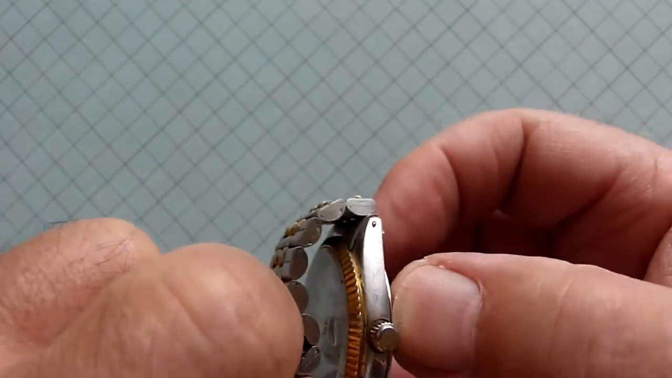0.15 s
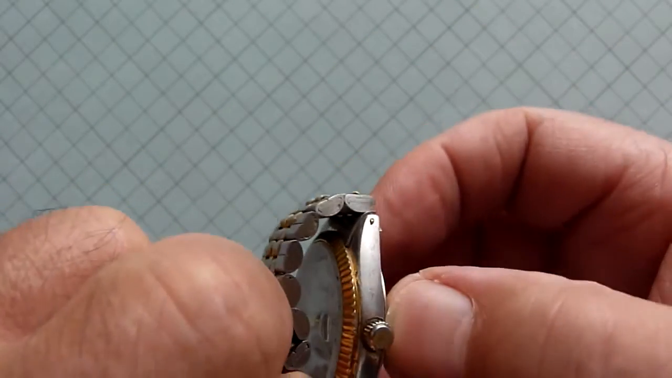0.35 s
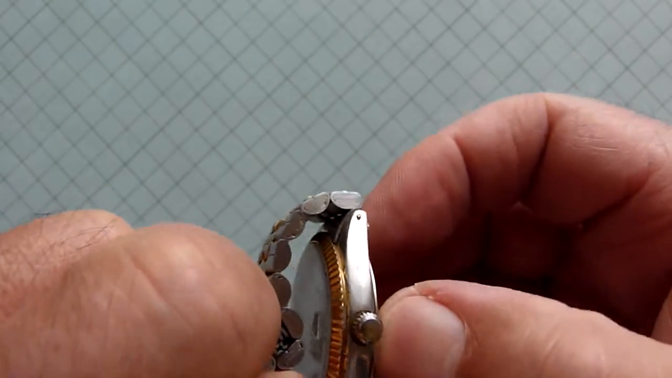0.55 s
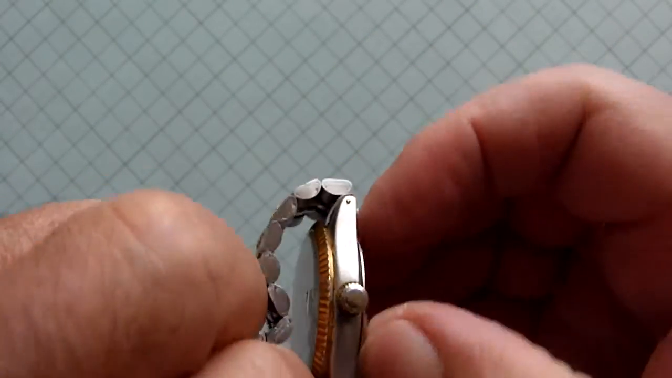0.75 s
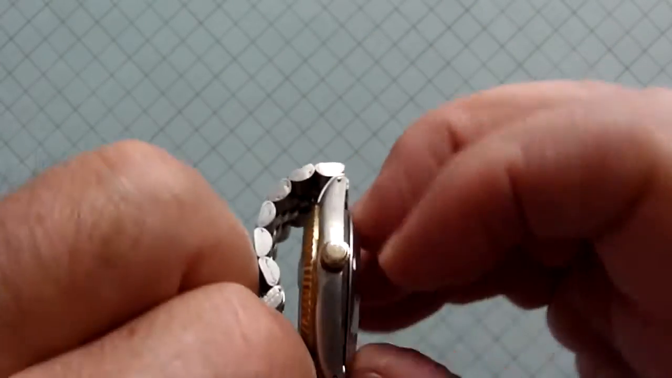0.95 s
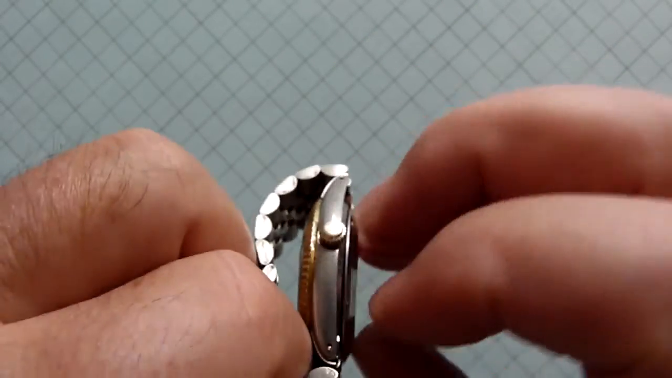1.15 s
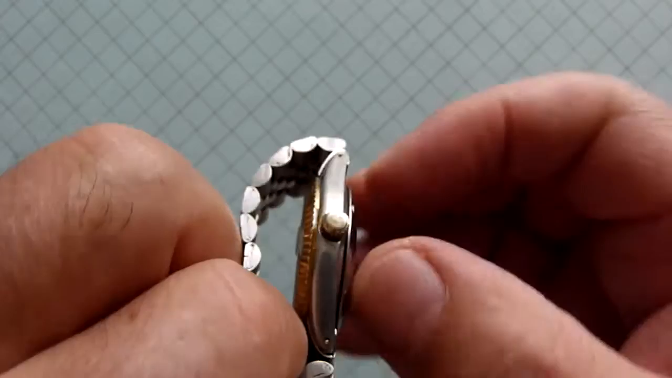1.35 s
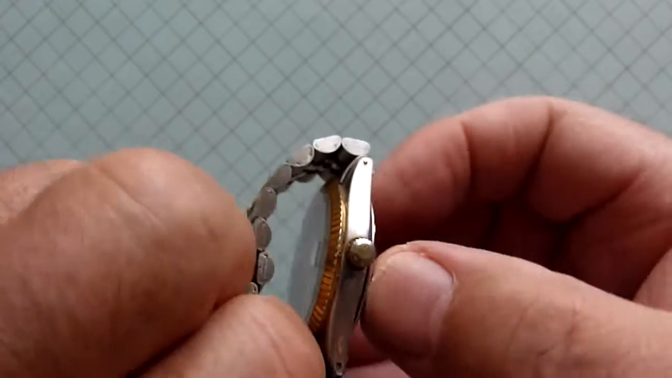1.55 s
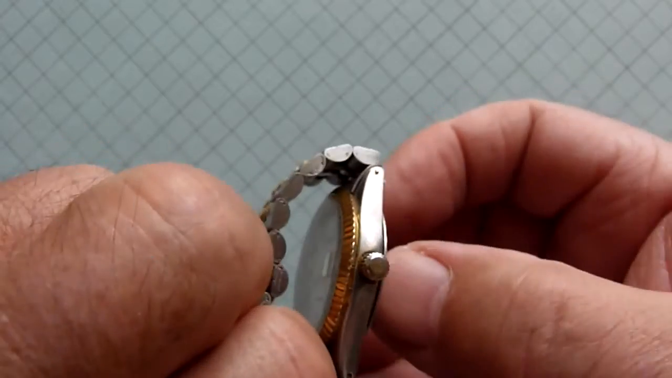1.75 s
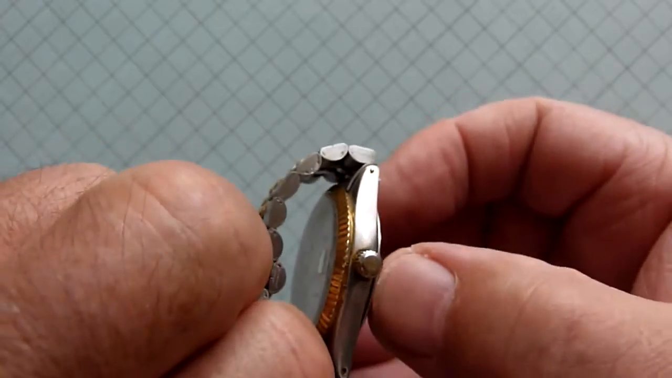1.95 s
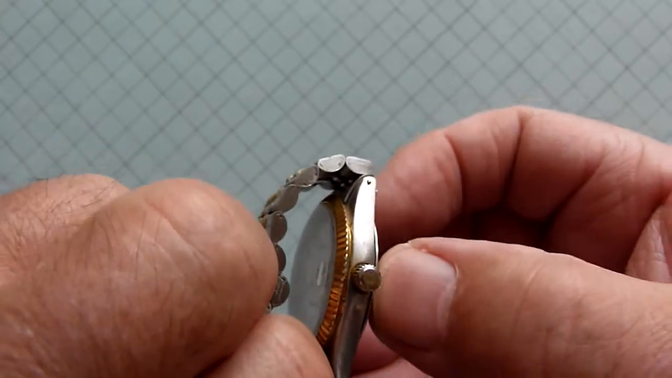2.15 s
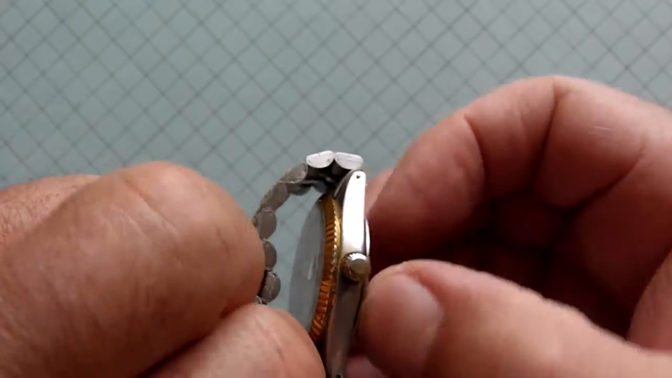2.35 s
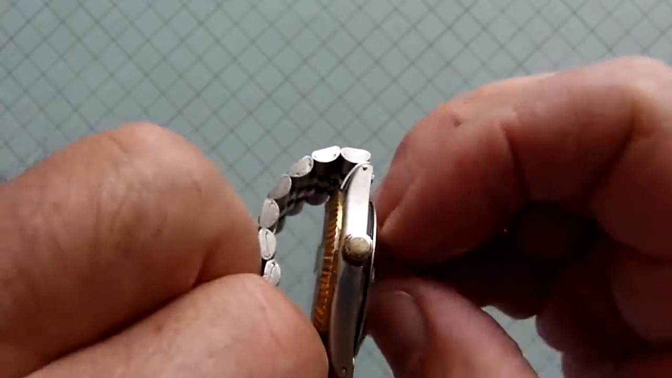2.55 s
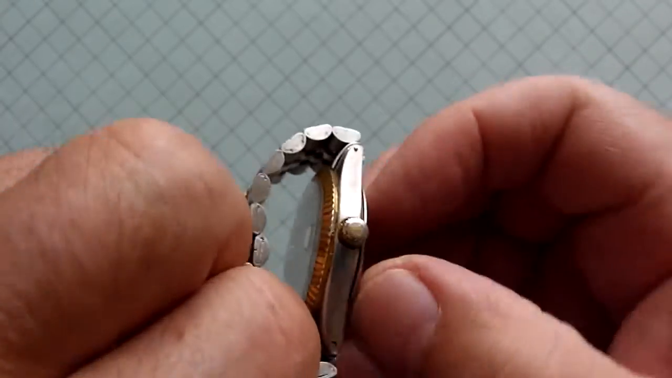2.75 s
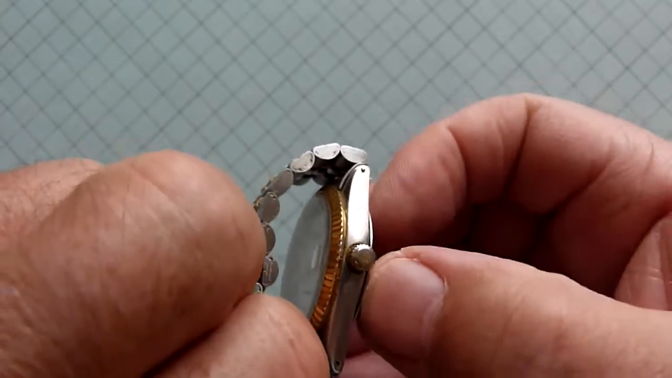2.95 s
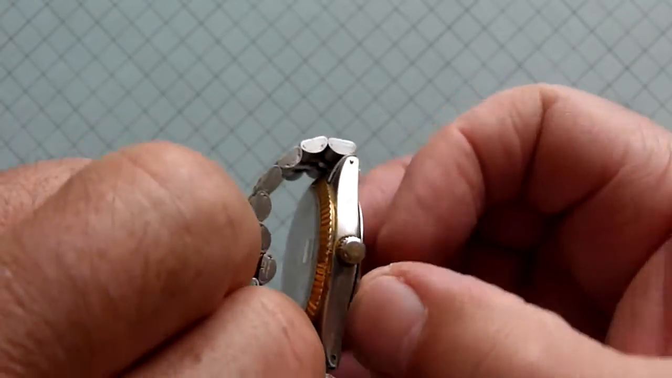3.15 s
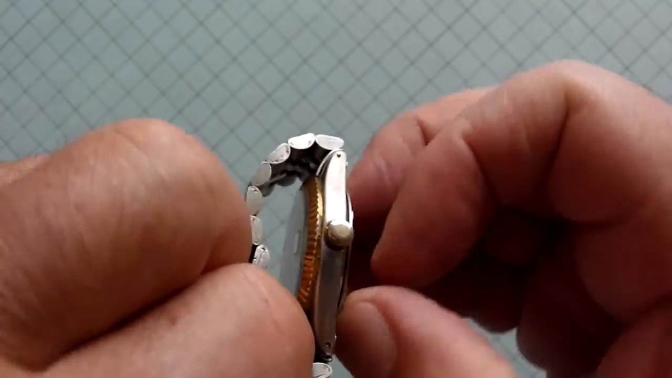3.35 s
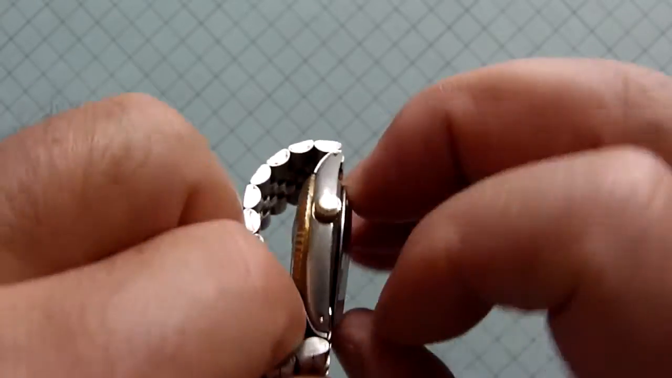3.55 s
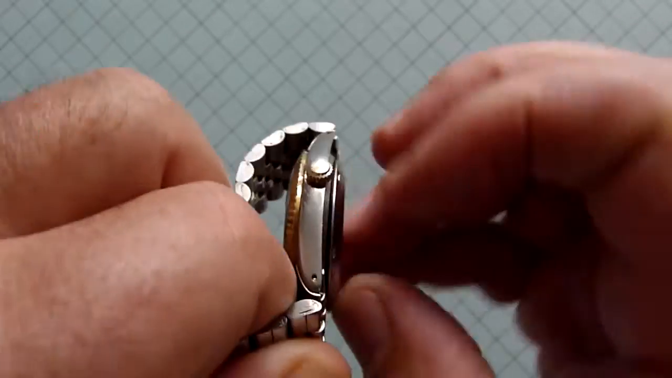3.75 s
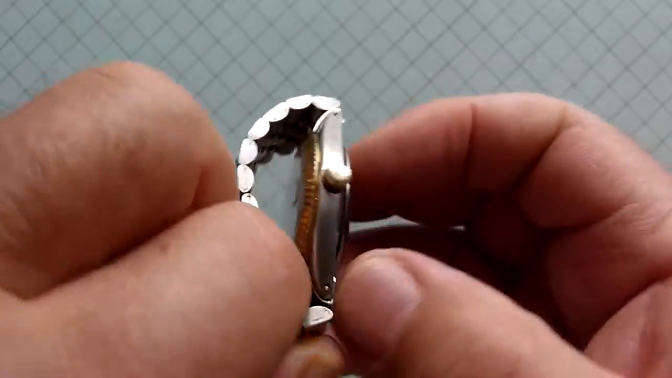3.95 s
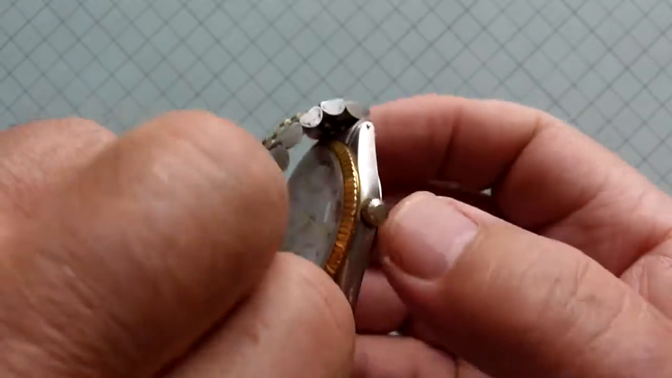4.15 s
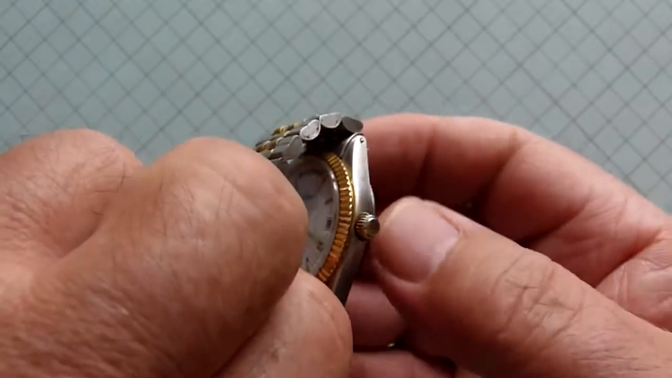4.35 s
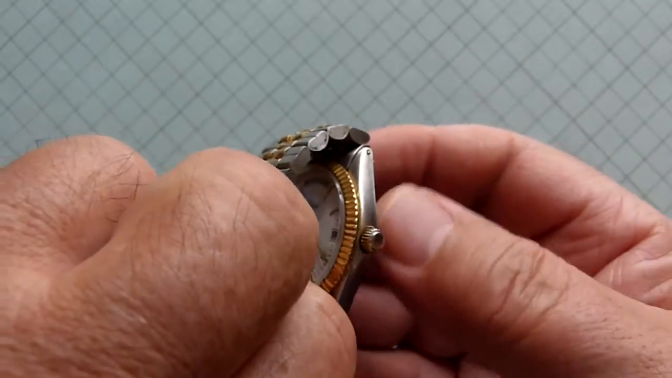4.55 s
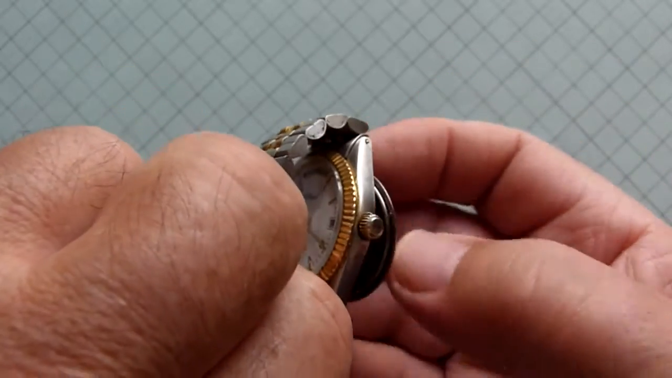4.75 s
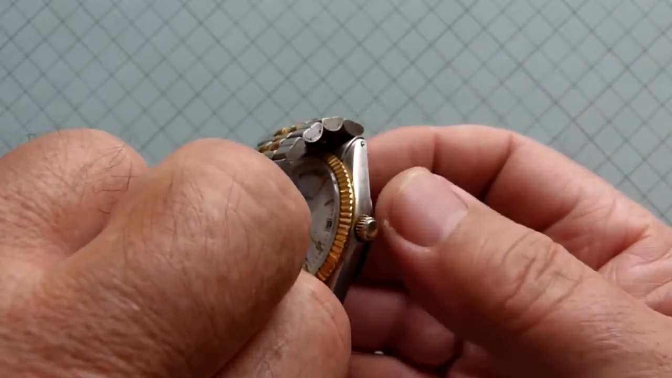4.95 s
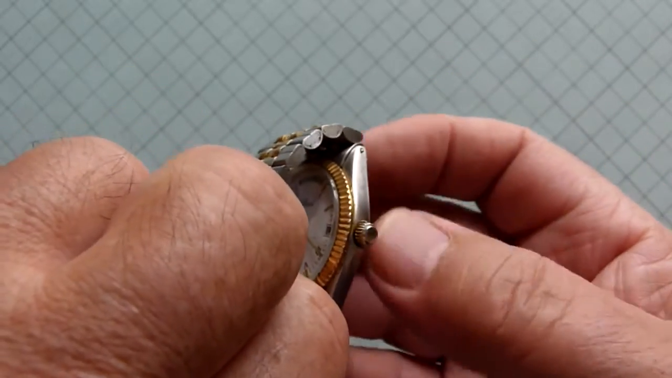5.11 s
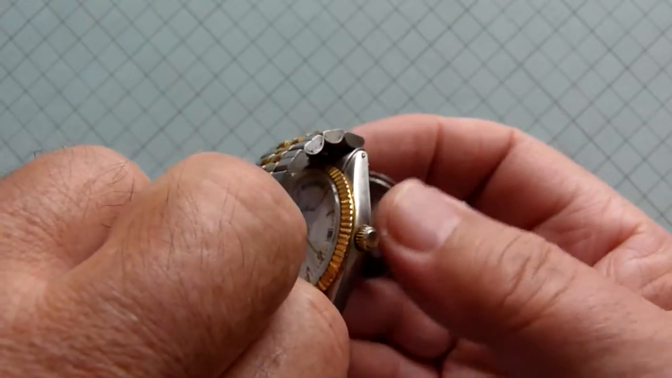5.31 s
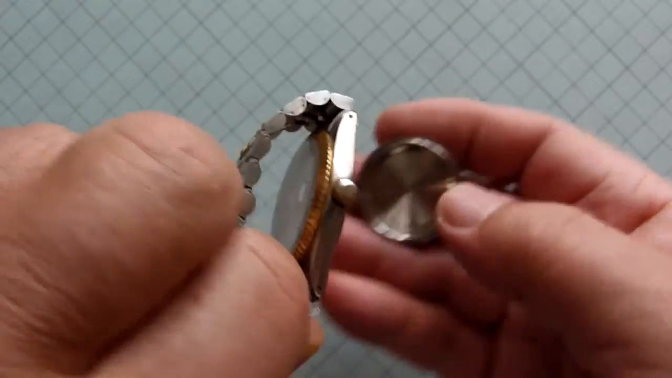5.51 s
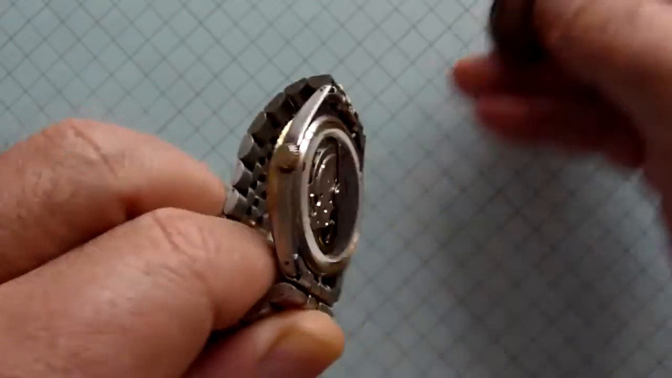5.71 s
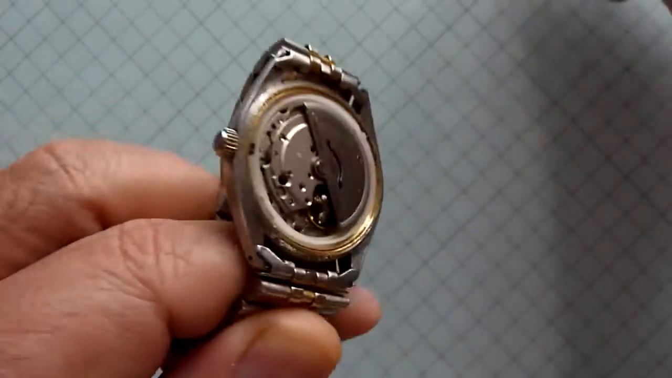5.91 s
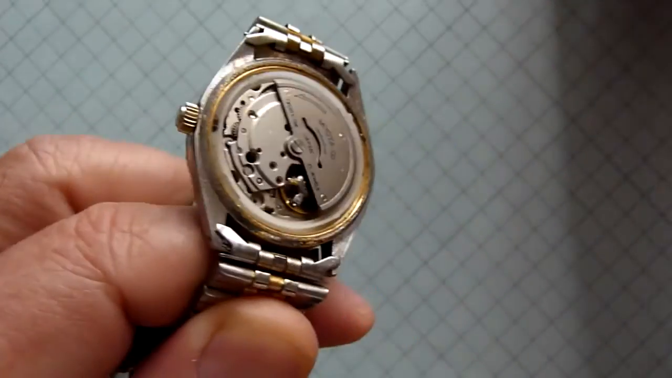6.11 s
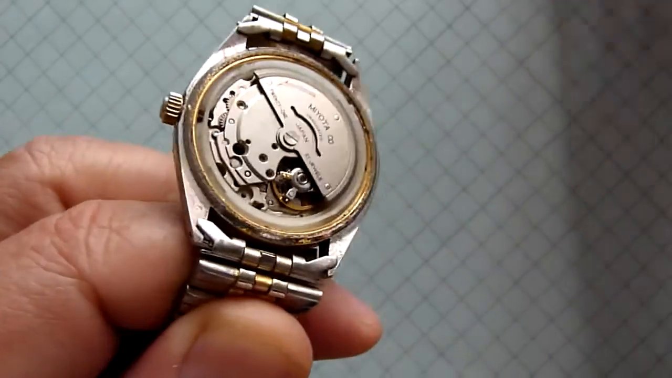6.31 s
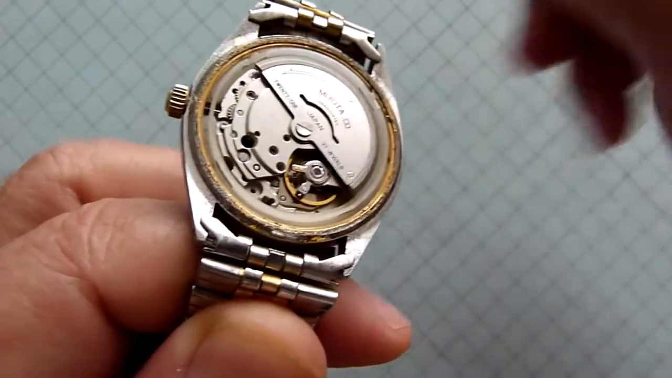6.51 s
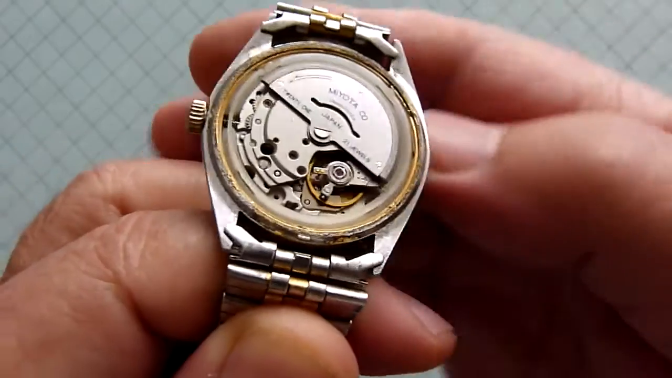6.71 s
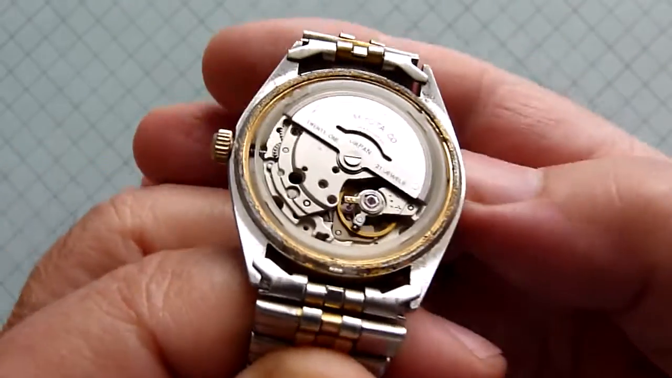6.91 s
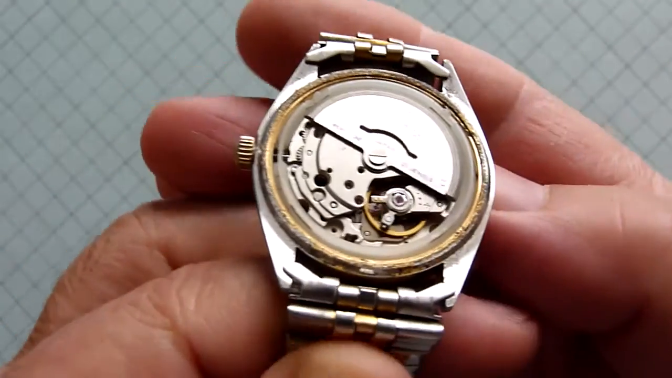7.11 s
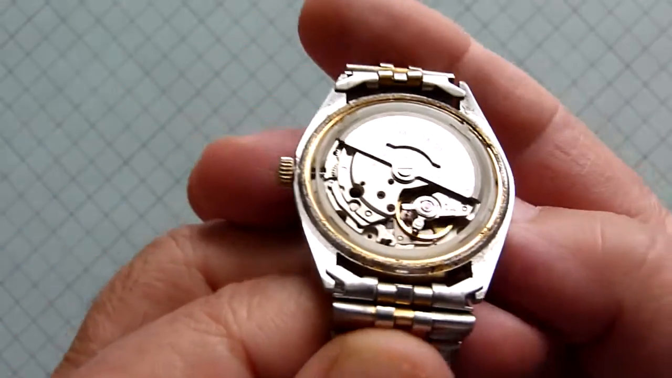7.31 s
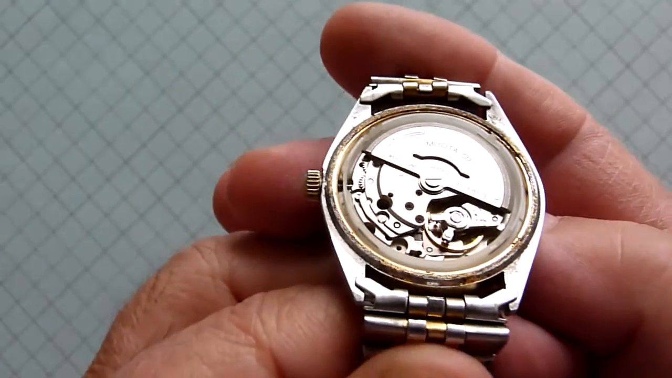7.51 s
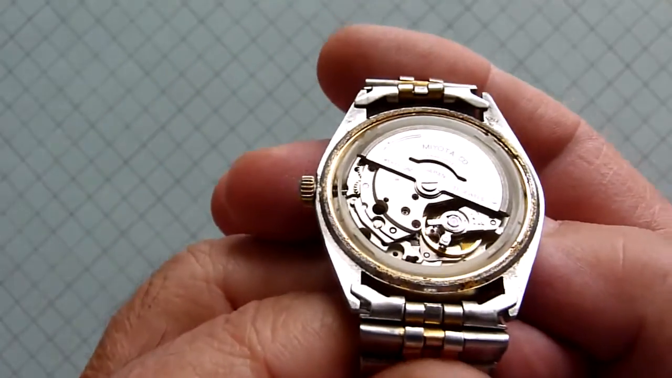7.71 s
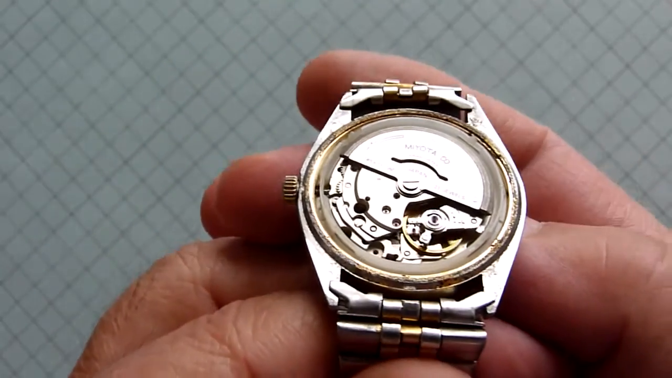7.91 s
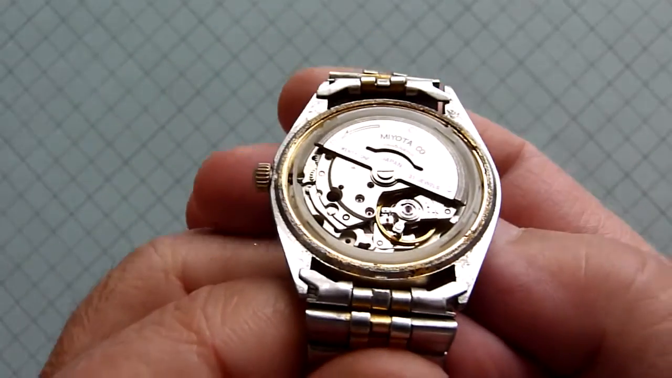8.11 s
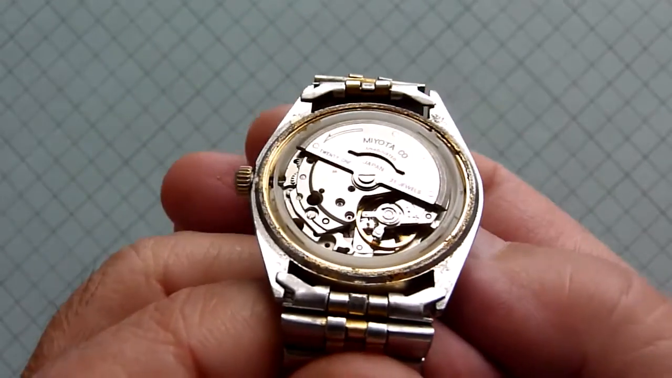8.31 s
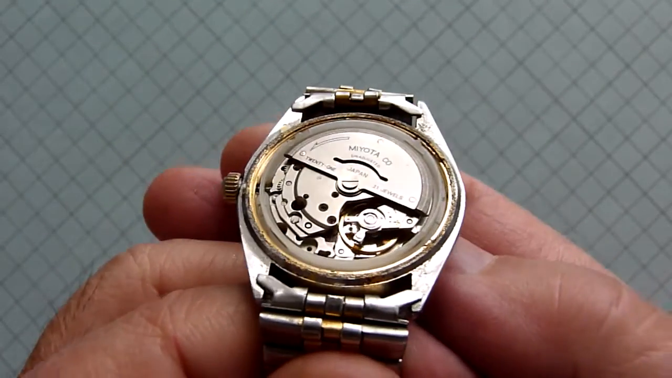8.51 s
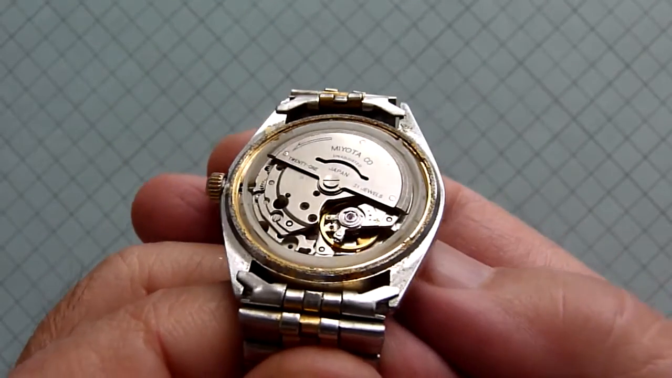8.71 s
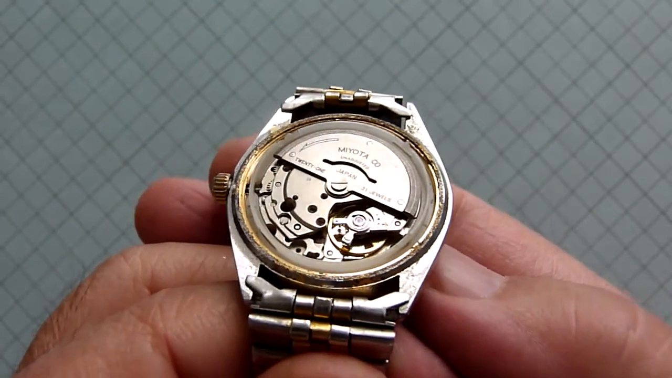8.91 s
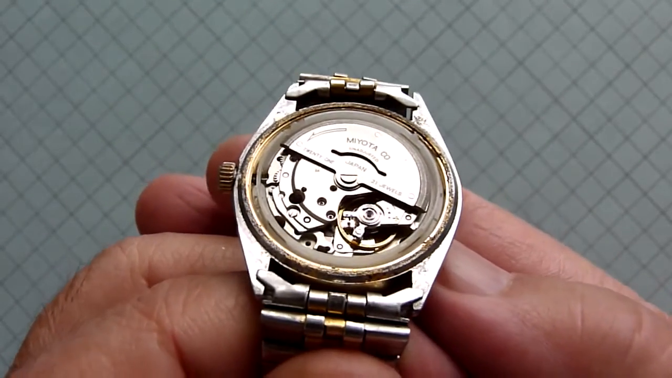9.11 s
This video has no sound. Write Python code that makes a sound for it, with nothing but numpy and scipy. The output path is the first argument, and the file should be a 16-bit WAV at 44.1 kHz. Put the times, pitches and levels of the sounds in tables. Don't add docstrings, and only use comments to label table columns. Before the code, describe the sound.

Very close in a quiet room, fingers rub a steel wristwatch with faint ticks and link clicks. After four seconds the loosened back rattles in a run of small dry knocks, then comes off with a bright, sharp clink at five and a half. Three firmer table taps follow, then soft handling, with light bracelet clicks near the end. Faint hum, hiss and distant traffic lie beneath.

```python
import sys
import numpy as np
from scipy import signal
from scipy.fft import rfft, irfft, next_fast_len
from scipy.io import wavfile
from scipy.ndimage import uniform_filter1d, map_coordinates

SR = 44100
rng = np.random.default_rng(int(sys.argv[2]) if len(sys.argv) > 2 else 0)


def generate_wav(signal):
    frames = np.transpose(np.atleast_2d(signal))
    scaled = np.clip(frames, -1, 1) * 32767
    pcm = np.round(scaled).astype(np.int16)
    wavfile.write(sys.argv[1], SR, pcm)


def volts_from_decibels(level):
    exponent = np.asarray(level, float) / 20
    return 10 ** exponent


N = 404232
BLOW_T = np.arange(SR // 11) / SR
LIFT_OFF = 5.5

# [f/Hz, width/Hz, level/dB]
LID_EDGE = [(7000, 220, 0.5), (9000, 1840, 2), (10470, 1550, 1.5), (11490, 800, 2.5), (13000, 2000, -28.5),
            (14300, 490, 1)]


def lid():
    # [t/s, knock level/dB, knock f/Hz, edge level/dB, ring level/dB]
    clinks = [(1.6916, -44.5, 1760, -39.5, -66), (2.8932, -32.5, 1270, -31.5, -76),
              (4.211, -32.5, 1580, -39.5, -40), (4.3211, -39, 1290, -34.5, -60),
              (4.7089, -34.5, 1420, -39.5, -59), (5.2259, -27, 1720, -31, -45.5),
              (5.539, -24, 1620, -13, -25), (5.5453, -29, 1910, -27, -39), (5.581, -36, 2100, -33.5, -47.5),
              (5.5878, -24, 2070, -28.5, -39), (5.602, -30, 1760, -37, -46.5), (5.607, -34, 1750, -31, -50)]
    # [t/s, knock level/dB, knock f/Hz, tick level/dB]
    rattle = [(4.0816, -52, 1580, -49), (4.1083, -44, 1380, -47), (4.137, -39.5, 1760, -48.5),
              (4.1745, -31, 1300, -46), (4.1843, -35, 1580, -43), (4.188, -43, 1610, -53),
              (4.2175, -37, 1800, -32.5), (4.3006, -46, 1710, -47), (4.3087, -47, 1570, -55),
              (4.399, -39, 1360, -40.5), (4.619, -46, 1560, -53), (4.695, -33, 1740, -49),
              (4.701, -27.5, 1510, -37), (4.749, -40, 1590, -52), (4.831, -48, 1610, -58),
              (4.856, -44, 1700, -50), (4.8588, -36, 1820, -41), (4.866, -35, 1720, -35),
              (4.8713, -37, 1680, -41), (4.88, -38, 1690, -54), (4.931, -45, 1700, -47),
              (4.9471, -36.5, 1680, -46), (5.003, -43, 1410, -63), (5.1907, -36, 1440, -54),
              (5.2297, -34.5, 1820, -44), (5.352, -38, 1700, -53), (5.3563, -33, 1500, -39),
              (5.362, -39, 1680, -46)]
    out = np.zeros((2, N + SR))
    for s, knock_db, hz, edge_db, ring_db in clinks:
        tick_db = edge_db + (0.8 if s < LIFT_OFF else -7.5)
        lid_blow(out, s, knock_db, hz, tick_db, edge_db, ring_db)
    for s, knock_db, hz, tick_db in rattle:
        lid_blow(out, s, knock_db, hz, tick_db, edge_db=tick_db - 11, ring_db=tick_db - 25)
    return out[:, :N]


def lid_blow(out, s, knock_db, hz, tick_db, edge_db, ring_db):
    # [f/Hz, width/Hz, level/dB]
    seated_tick = [(2040, 890, -0.5), (3600, 760, 2.5), (5700, 4050, 2), (7000, 2800, 0.5)]
    # [f/Hz, width/Hz, level/dB]
    free_tick = [(2200, 700, -3.5), (4000, 1800, -4.5), (5500, 1550, 0.5), (7000, 1950, -4.5)]
    seated = s < LIFT_OFF
    body = volts_from_decibels(knock_db + 5) * knock(hz, 0.01)
    parts = volts_from_decibels(tick_db + 1.5) * tick(seated_tick if seated else free_tick, 0.013, 0.6)
    edge = volts_from_decibels(edge_db) * tick(LID_EDGE, 0.0072, 0.12, hard=30)
    lean = volts_from_decibels(2.2 * np.array([[-1], [1], [0]]))
    ring = volts_from_decibels(ring_db + 7.5) * lean * lid_ring(seated)
    add(out, s, body + parts + edge + ring, room_db=-0.4)


def lid_ring(seated):
    # [f/Hz, level/dB, t60/s]
    lid_modes = [(5600, -13.5, 0.033), (5720, -10, .045), (5880, -12, .03), (8530, -14, .05),
                 (8700, -13, 0.05), (9400, -16, .04), (10760, -16, .04), (11440, -3, 0.065),
                 (11900, -15, 0.06), (11380, -7, .06), (14400, -17, .035), (14900, -24.5, .04)]
    hz, db, t60 = np.transpose(lid_modes)
    detune, share, phase = rng.standard_normal((3, len(hz)))
    db = db + 1.2 * share + 8 * seated * (abs(hz - 5730) < 90)
    lag = (0.89 + 0.6 * phase) * hz / 9000
    y = rings(hz * (1 + 0.0013 * detune), db, t60, lag, attack=0.00016)
    return y[[0, 1, 0]]


def table_taps():
    # [t/s, knock level/dB, knock f/Hz, thud level/dB]
    taps = [
        (6.3867, -18, 1060, -37),
        (6.591, -23, 937, -31),
        (6.631, -21.5, 996, -37.5),
    ]
    # [f/Hz, width/Hz, level/dB]
    rim_tick = [(2000, 860, 2), (3320, 890, 4), (5700, 3300, -5.5)]
    out = np.zeros((2, N + SR))
    for s, knock_db, hz, thud_db in taps:
        body = volts_from_decibels(knock_db) * knock(hz, 0.013)
        table = knock(344, 0.032) + volts_from_decibels(-7.5) * knock(642, 0.1)
        thud = volts_from_decibels(thud_db) * table
        edge = volts_from_decibels(thud_db - 14.5) * tick(LID_EDGE, 0.012, 0.4)
        rim = volts_from_decibels(knock_db - 16) * tick(rim_tick, 0.018, 0.47)
        add(out, s, body + thud + edge + rim, room_db=2)
    return out[:, :N]


def case_and_links():
    # [t/s, knock level/dB, knock f/Hz, tick level/dB]
    grips = [(0.401, -49, 1000, -60.5), (0.7075, -48.5, 1230, -57), (1.1329, -48.5, 1180, -50),
             (1.3015, -49, 1180, -54), (1.3167, -47, 1710, -37.5), (1.468, -46, 1610, -59),
             (1.4789, -51, 1540, -40.5), (1.568, -47.5, 1460, -42.5), (1.572, -50, 1300, -54),
             (1.584, -44, 447, -55), (1.748, -45.5, 400, -55), (2.7461, -33, 1350, -43),
             (2.7534, -46, 1410, -50), (2.7718, -40.5, 1240, -44.5), (2.8663, -53, 930, -61),
             (2.905, -42, 1580, -51), (2.911, -43, 1640, -51), (3.6565, -43.5, 1430, -40),
             (3.857, -44.5, 1390, -45), (7.4146, -54, 1380, -50.5)]
    # [t/s, tick level/dB, sharp edge level/dB]
    links = [(1.326, -45, -43), (1.5764, -41.5, -49), (1.6493, -60, -64), (1.8783, -56, -68),
             (1.996, -48, -61), (3.0031, -52, -50), (3.0576, -57, -53), (3.9308, -45, -61),
             (3.9962, -51, -56), (4.0106, -57, -65), (5.9503, -53.5, -58), (7.7512, -49, -50.5),
             (7.834, -56, -52), (7.8464, -46, -36), (7.849, -44, -38), (7.8523, -40, -33),
             (7.899, -62, -42.5)]
    out = np.zeros((2, N + SR))
    for s, knock_db, hz, tick_db in grips:
        case_blow(out, s, knock_db, hz, tick_db, edge_db=tick_db - 2.5, room_db=1)
    for s, tick_db, edge_db in links:
        case_blow(out, s, tick_db - 14, 1000, tick_db, edge_db, room_db=2)
    return out[:, :N]


def case_blow(out, s, knock_db, hz, tick_db, edge_db, room_db):
    # [f/Hz, width/Hz, level/dB]
    case_tick = [(2000, 640, -5), (3200, 1400, -2), (5700, 2050, 0.5), (7000, 2130, -2.5)]
    # [f/Hz, width/Hz, level/dB]
    link_edge = [(7250, 2100, 1), (9500, 1200, 3.5), (11900, 2000, 1), (15000, 1700, -5)]
    body = volts_from_decibels(knock_db + 10.5) * knock(hz, 0.0053)
    parts = volts_from_decibels(tick_db + 1.5) * tick(case_tick, 0.016, 0.29)
    edge = volts_from_decibels(edge_db + 2.5) * tick(link_edge, 0.012, 0.21)
    add(out, s, body + parts + edge, room_db)


def knock(hz, t60):
    def body(life):
        modes = hz * np.array([0.75, 1, 1.3, 1.8])
        lives = life * np.array([1, 1, 0.89, 0.63])
        return rings(modes, [-11.5, 2.5, -6, -14.5], lives, [0, 0.1, 0.2, 0.4], attack=0.0002)

    near, far = body(t60), body(0.29 * t60)
    to_walls = far[0] * np.linalg.norm(near[0]) / np.linalg.norm(far[0])
    no_bass = signal.butter(2, 0.76 * hz, "high", fs=SR, output="sos")
    return signal.sosfilt(no_bass, np.array([*near, to_walls]))


def rings(hz, db, t60, lag, attack):
    hz, db, t60, lag = (np.asarray(v)[:, None] for v in (hz, db, t60, lag))
    t = BLOW_T
    shape = volts_from_decibels(db - 60 * t / t60) * (1 - np.exp(-t / attack))
    return np.array([(shape * np.sin(2 * np.pi * hz * t + side * lag)).sum(0) for side in (0.5, -0.5)])


def tick(modes, t60, alike, hard=7.2):
    t, n = BLOW_T, len(BLOW_T)
    f = np.fft.rfftfreq(2 * n, 1 / SR)
    colour = 0
    for k, (c, w, db) in enumerate(modes):
        colour = colour + (-1) ** k * volts_from_decibels(db) * 1j * f * w / (c * c - f * f + 1j * f * w)
    a, b = rng.standard_normal((2, n)) * volts_from_decibels(-60 * t / t60) * (1 - np.exp(-t / 0.00022))
    first = hard * np.eye(8, n)[[5, 4]]
    spray = np.array([first[0] + a + (1 - alike) * b, first[1] + a - (1 - alike) * b, t == 0])
    y = irfft(rfft(spray, 2 * n) * colour ** 2)[:, :n]
    return 5.6 * y / np.linalg.norm(y, axis=1, keepdims=True)


def fingers():
    # [t/s, level/dB]
    rub = [(0.0, -64.5), (0.97, -66.5), (1.5, -55.5), (2.09, -68.5), (2.63, -68), (2.78, -63), (3.0, -61),
           (3.32, -76), (3.6, -58.5), (4.11, -59.5), (4.26, -69), (5.05, -64), (5.72, -63.5), (6.56, -59),
           (7.07, -60.5), (8.17, -69.5), (9.17, -68.5)]
    # [f/Hz, level/dB per Hz]
    skin = [(1500, 7), (3200, 7), (6000, 2), (10000, 1.5), (15000, -8), (18000, -33)]
    return volts_from_decibels(curve(rub) - 7 + 2.23 * wobble(30)) * rush(skin, [(3000, 0.1)])


def slips():
    # [t/s, length/s, level/dB, centre f/Hz, width/Hz]
    slip_events = [(1.198, .2, -74, 3500, 3000), (1.58, 0.028, -53, 3600, 900),
                   (1.59, 0.024, -63, 497, 300), (3.774, 0.074, -62.5, 3100, 1200),
                   (3.823, 0.013, -51.5, 3200, 800), (3.843, 0.02, -50.5, 2950, 800),
                   (3.95, 0.087, -66, 3000, 2000), (4.871, 0.011, -31, 1660, 380),
                   (4.898, 0.06, -49.5, 1650, 400), (4.151, .025, -51, 1530, 500),
                   (5.543, .006, -30, 1678, 693), (4.868, 0.0118, -48, 3600, 500),
                   (4.941, .05, -51.5, 1690, 500), (5.604, .06, -41.5, 1800, 800),
                   (6.098, .08, -63, 9500, 7000), (6.25, 0.072, -66, 10000, 7000),
                   (6.532, 0.082, -65, 9000, 8000), (7.831, 0.028, -61, 9000, 8000),
                   (7.889, 0.11, -65, 5700, 1600), (7.41, 0.092, -67, 9000, 7950)]
    out = np.zeros((2, N))
    for s, length, db, hz, width_hz in slip_events:
        n = round(2 * length * SR)
        a, b, grain = rng.standard_normal((3, SR // 2))[:, :n]
        rough = volts_from_decibels(3.8 * unit(uniform_filter1d(grain, size=90)))
        edges = [max(hz - width_hz / 2, 50), min(hz + width_hz / 2, 17000)]
        band = signal.butter(2, edges, "band", fs=SR, output="sos")
        unlike = min(hz / 9000, 1)
        friction = unit(signal.sosfilt(band, rough * [a + unlike * b, a - unlike * b]))
        out[:, round((s - length) * SR):][:, :n] += volts_from_decibels(db) * np.hanning(n) ** 2 * friction
    return out


def add(out, s, blow, room_db):
    far = volts_from_decibels(room_db) * signal.fftconvolve(blow[2:], room_tail(), axes=1)
    start = round(s * SR)
    out[:, start:][:, :blow.shape[1]] += blow[:2]
    out[:, start:][:, :far.shape[1]] += far


def room_tail():
    # [f/Hz, t60/s]
    room_t60 = [(500, 0.25), (2000, 0.55), (6000, 0.51), (12000, 0.41), (16000, 0.15)]
    # [f/Hz, level/dB]
    wet = [(500, -12), (2000, -6), (6000, -7.5), (12000, -9.5), (14800, -5), (16200, -35)]
    hz, t, z = signal.stft(rng.standard_normal((2, SR // 3)), SR, nperseg=256)
    decay = volts_from_decibels(-60 * t / along(room_t60, hz)[:, None])
    level = volts_from_decibels(along(wet, hz))[:, None] / np.linalg.norm(decay, axis=1, keepdims=True)
    tail = signal.istft(z * decay * level, SR, nperseg=256)[1] / np.sqrt(128)
    shared = np.cos(0.45) * tail[0] + np.sin(0.45) * tail[1] * np.array([[1], [-1]])
    return shared * np.clip((np.arange(tail.shape[1]) / SR - 0.005) / 0.0009, 0, 1)


def fan_hum():
    # [f/Hz, rms level/dB]
    orders = [(48.8, -85), (98.5, -74), (147, -68.5), (199, -68), (253.5, -65.5), (301.5, -69.5),
              (346, -67)]
    t = np.arange(N) / SR
    return sum(volts_from_decibels(db + 4 + 3 * wobble(5)) * np.sin(2 * np.pi * hz * t + 2.2 * wobble(6)) for hz, db in orders)


def room_air():
    # [f/Hz, level/dB per Hz]
    air = [(15, -62), (25, -33), (49, -16.5), (70, -25.5), (90, -16), (256, -3), (344, -8.5), (405, -10),
           (695, -16), (2000, -25), (3000, -31), (6000, -59)]
    # [f/Hz, likeness]
    alike = [(30, 1), (80, 0.92), (180, 1), (600, 0.95), (900, 0.61), (1500, 0.7), (2100, 0.049)]
    return volts_from_decibels(-55.5 + 0.16 * wobble(1.463)) * rush(air, alike)


def far_road():
    # [t/s, swell/dB]
    passes = [(0.3, 3.5), (1.2, 6), (2.86, 4.5), (3.75, 4.5), (4.21, 4), (5.0, 4), (5.8, 5), (6.7, 9),
              (8.88, 7.5)]
    # [f/Hz, level/dB per Hz]
    road = [(500, -21), (850, -2.5), (980, -0.5), (1150, -10), (1450, -4.5), (2200, -30)]
    t = np.arange(N) / SR
    swell_db = sum(db * np.exp(-((t - s) / 0.23) ** 2) for s, db in passes)
    return volts_from_decibels(-67.5 + swell_db) * rush(road, [(1000, 0.71)])


def microphone_hiss():
    # [f/Hz, level/dB per Hz]
    hiss = [(300, -29), (2000, -12), (3700, 4), (6000, 2.5), (9000, 0.5), (14400, -1), (17000, -10)]
    return volts_from_decibels(-67) * rush(hiss, [(3000, -0.26)])


def rush(spectrum, alike):
    def split(hz):
        turn = np.arccos(np.clip(along(alike, hz), -1, 1)) / 2
        return volts_from_decibels(along(spectrum, hz)) * [np.cos(turn), np.sin(turn)]

    mid, side = filtered(rng.standard_normal((2, N)), split)
    return unit(np.array([mid + side, mid - side]))


def filtered(x, response):
    m = next_fast_len(N + SR // 2)
    return irfft(rfft(x, m) * response(np.fft.rfftfreq(m, 1 / SR)), m)[..., :N]


def wobble(rate):
    at = np.arange(0, N + 64, 64)
    knots = rng.standard_normal(int(N * rate / SR) + 4)
    return np.interp(np.arange(N), at, map_coordinates(knots, [at * rate / SR]))


def curve(rows):
    return np.interp(np.arange(N) / SR, *np.transpose(rows))


def along(points, hz):
    f, v = np.transpose(points)
    return np.interp(np.log(hz + 1), np.log(f + 1), v)


def unit(x):
    return x / np.sqrt(np.mean(x ** 2) + 1e-20)


def scene():
    watch = lid() + table_taps() + case_and_links()
    hands = fingers() + slips()
    return watch + hands + fan_hum() + room_air() + far_road() + microphone_hiss()


def band_limit(x):
    return signal.sosfilt(signal.butter(12, 16820, fs=SR, output="sos"), x)


def record(dry):
    # [f/Hz, width/Hz, gain left at centre]
    notches = [(2580, 470, .1), (4590, 350, .1), (7900, 250, .4)]

    def response(f):
        cuts = [(c * c - f * f + 1j * f * w * g) / (c * c - f * f + 1j * f * w) for c, w, g in notches]
        return np.prod(cuts, 0) ** 2 * (f < 16800)

    hz, _, z = signal.stft(filtered(dry, response), SR, nperseg=1024)
    power = (abs(z) ** 2).mean(0)
    local = uniform_filter1d(power, size=9, axis=0)
    ring = power[(hz > 11200) & (hz < 11700)].mean(0)
    settled = ring < 3 * np.roll(ring, shift=2)
    above_ring = ((hz > 12200) & (hz < 13900))[:, None]
    masked = above_ring & (local < volts_from_decibels(-30) * ring) & settled
    floor = volts_from_decibels(-212 + 24 * np.clip((hz[:, None] - 14900) / 600, 0, 1))
    faint = (hz > 14900)[:, None] & (local < floor)
    mix = signal.istft(np.where(masked | faint, 0.003, 1) * z, SR, nperseg=1024)[1][:, :N]
    return band_limit(mix)


dry = scene()
out = record(dry)
generate_wav(out)
```